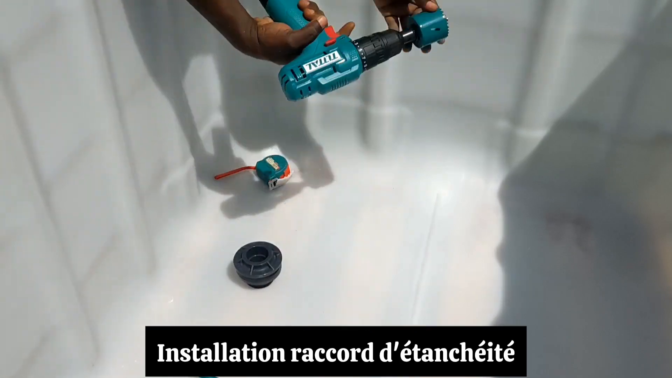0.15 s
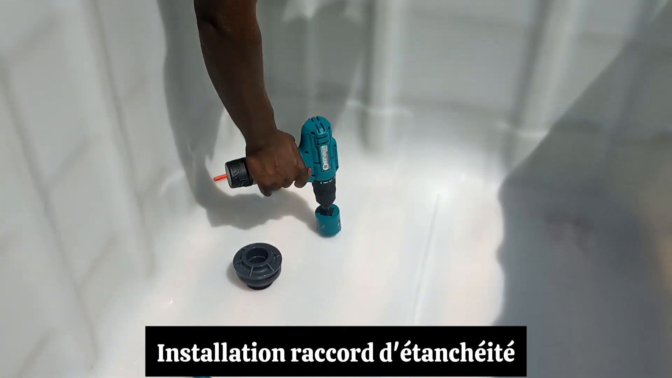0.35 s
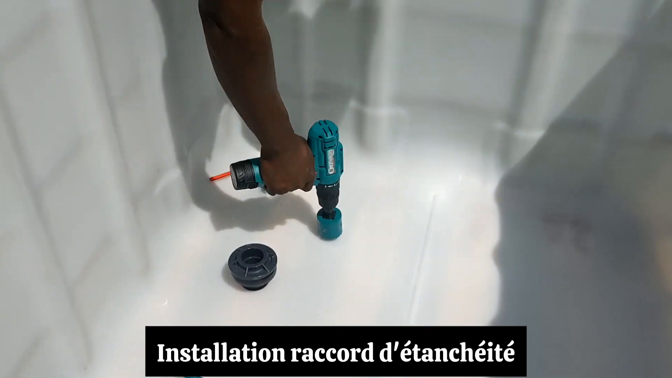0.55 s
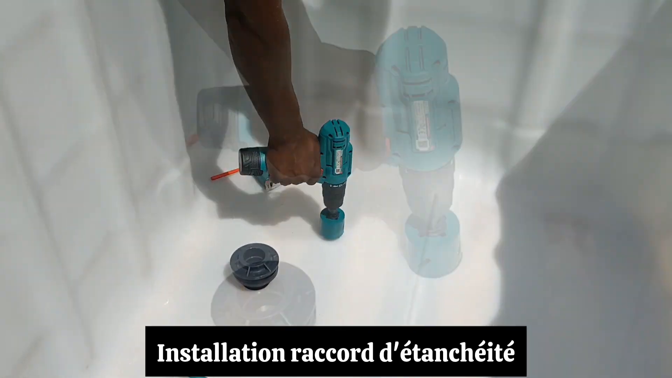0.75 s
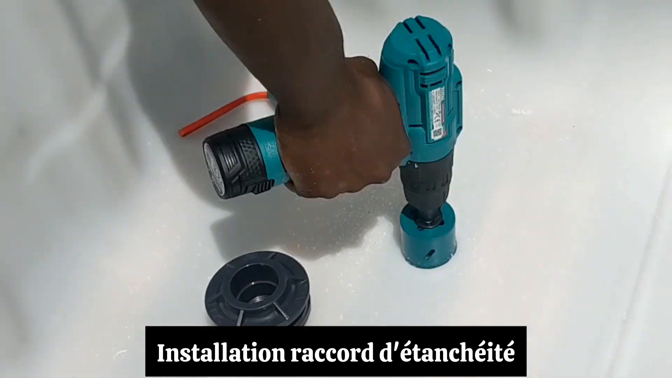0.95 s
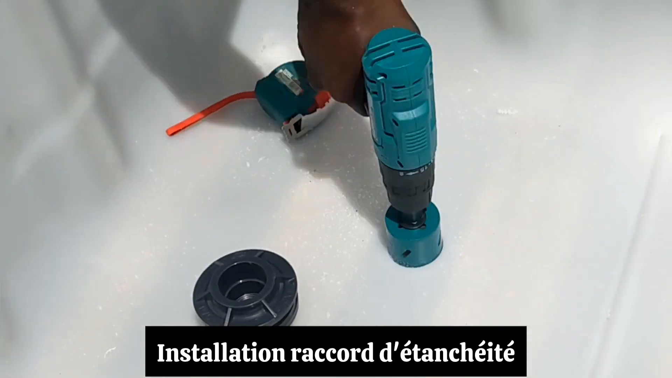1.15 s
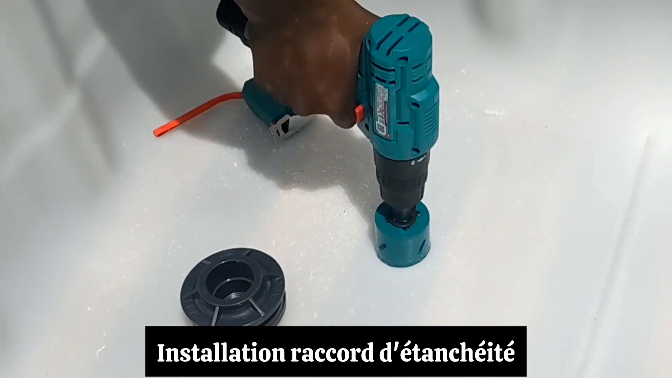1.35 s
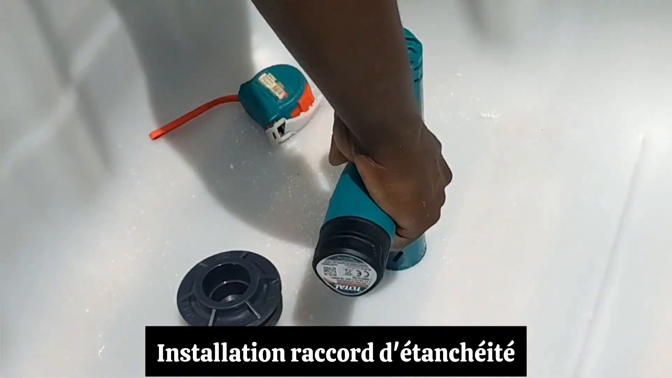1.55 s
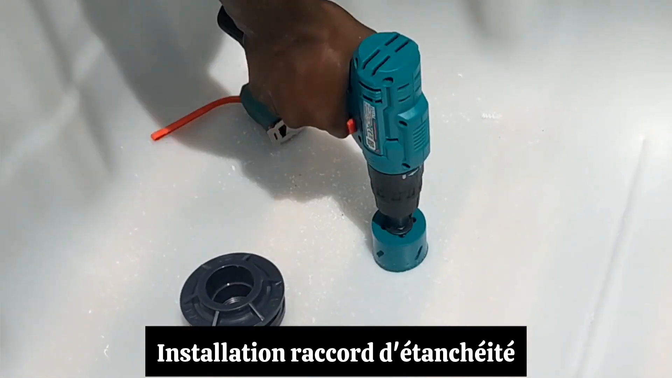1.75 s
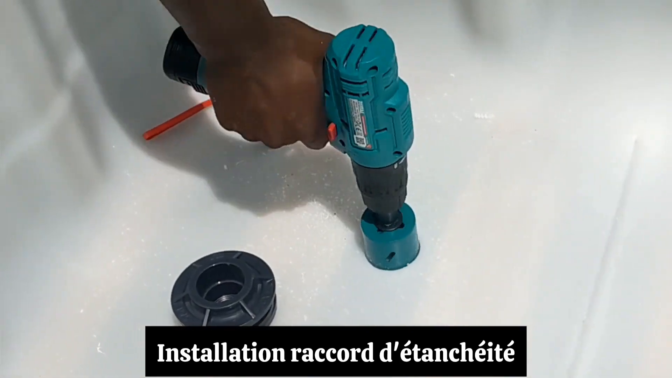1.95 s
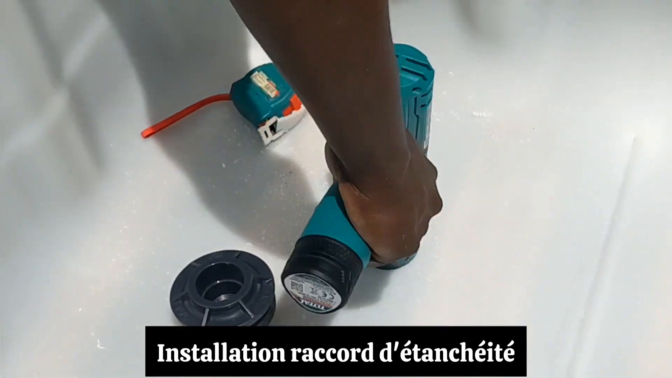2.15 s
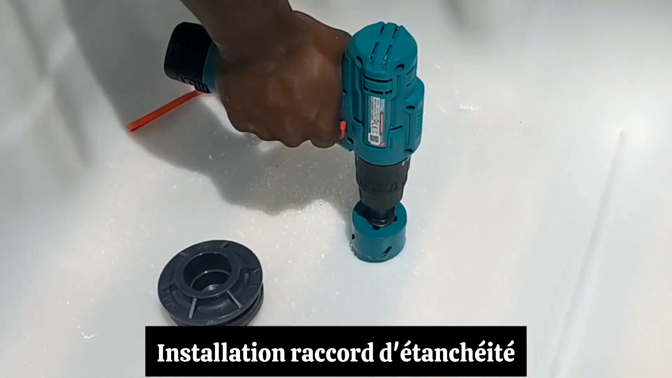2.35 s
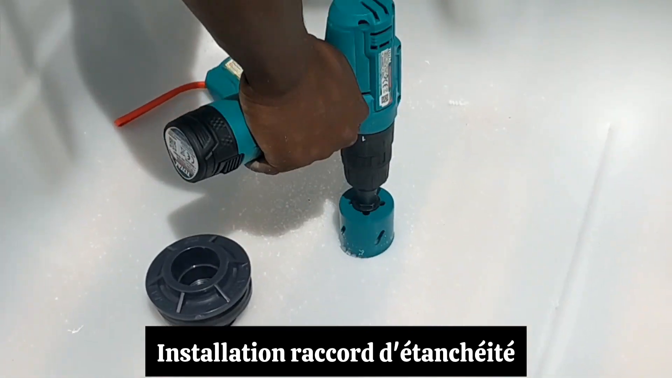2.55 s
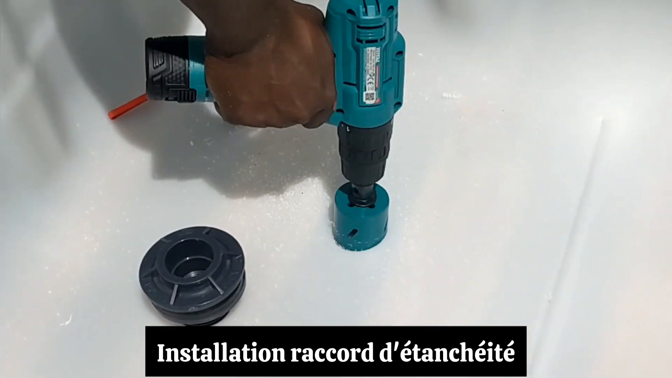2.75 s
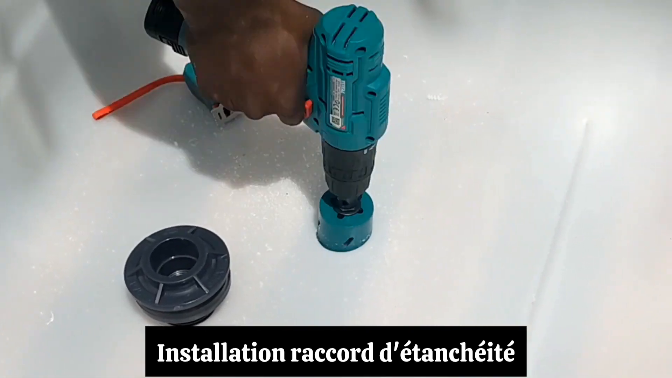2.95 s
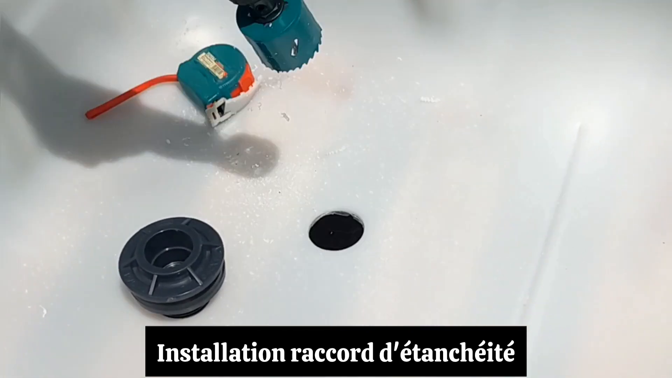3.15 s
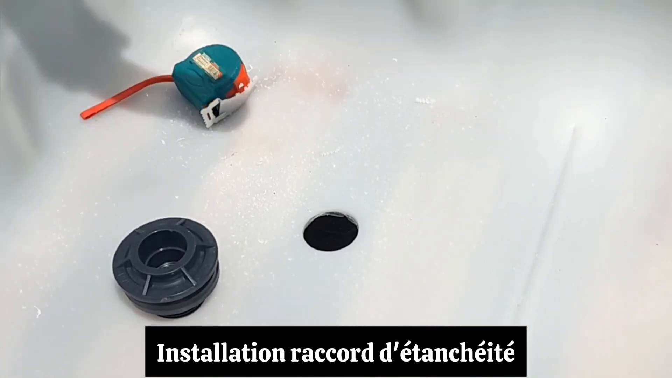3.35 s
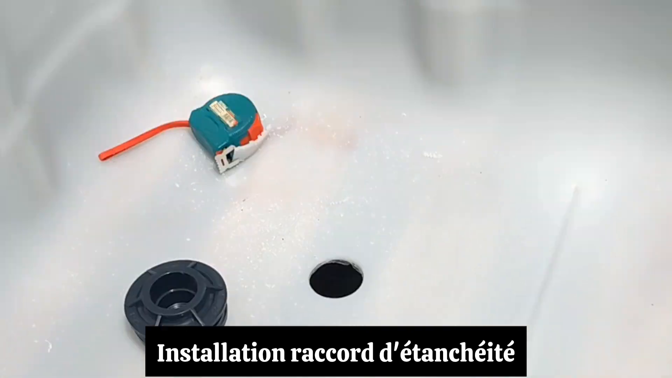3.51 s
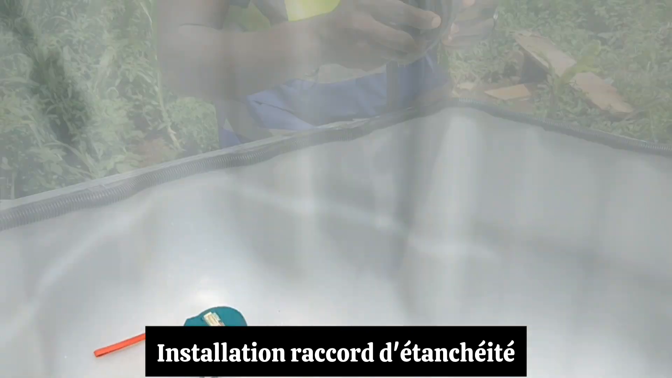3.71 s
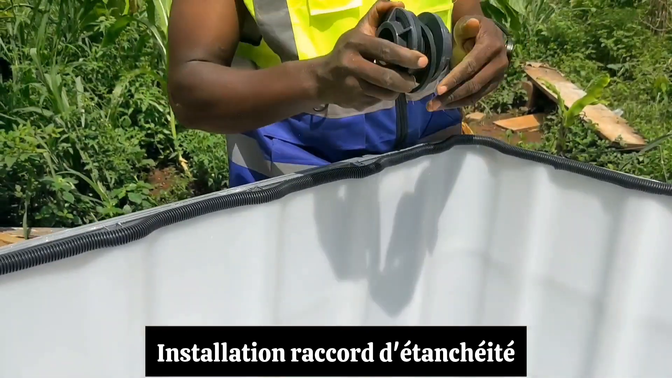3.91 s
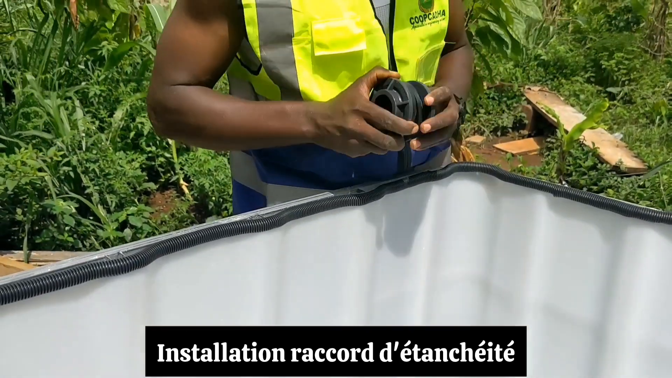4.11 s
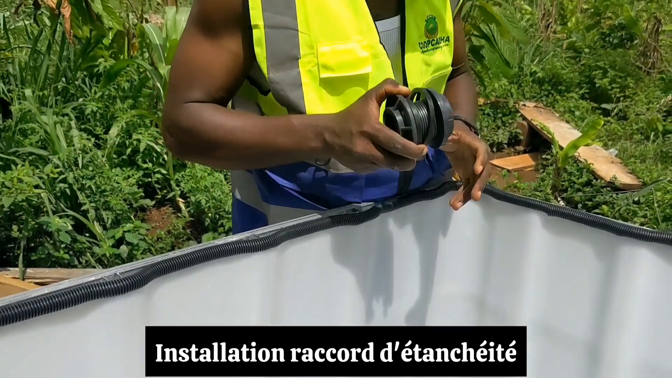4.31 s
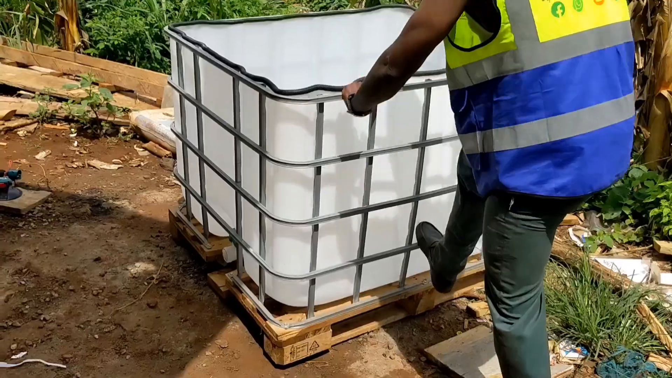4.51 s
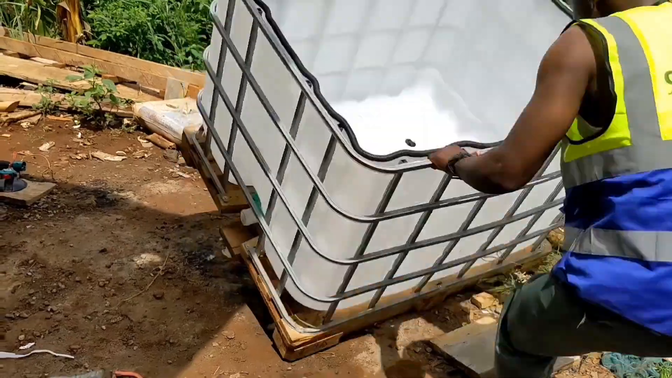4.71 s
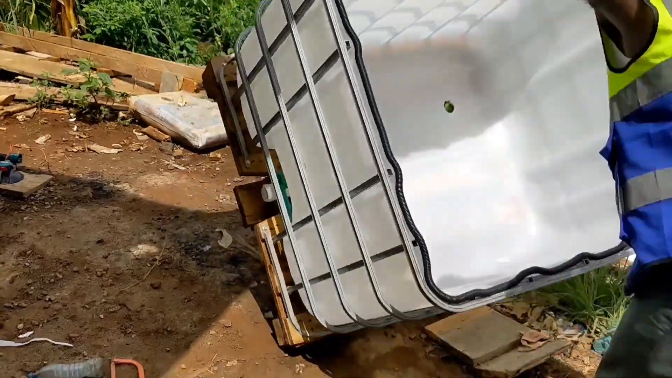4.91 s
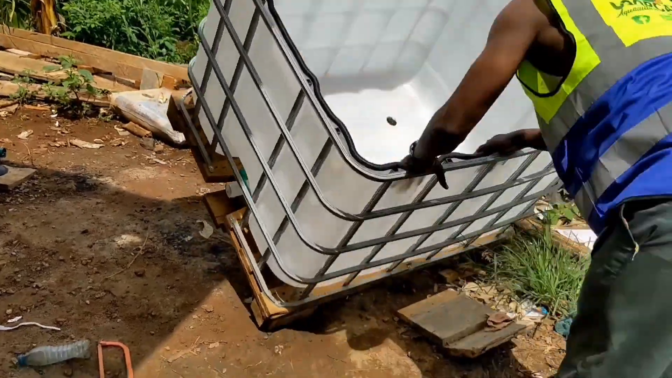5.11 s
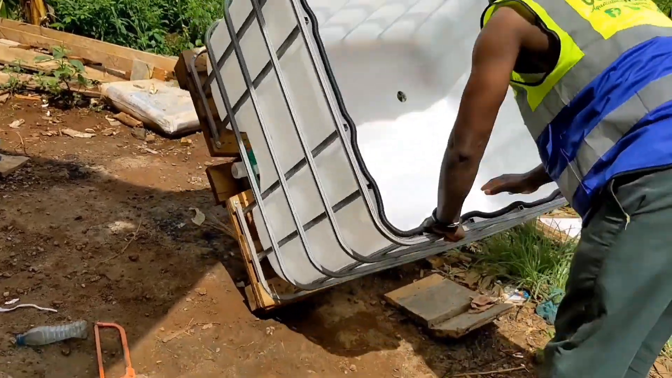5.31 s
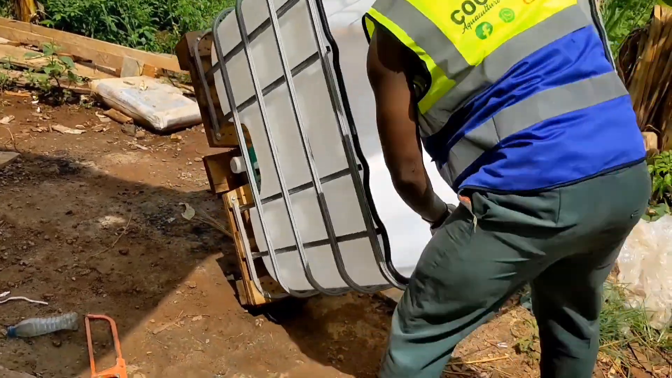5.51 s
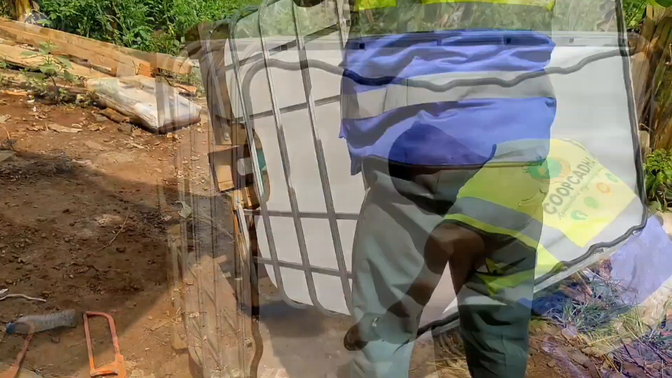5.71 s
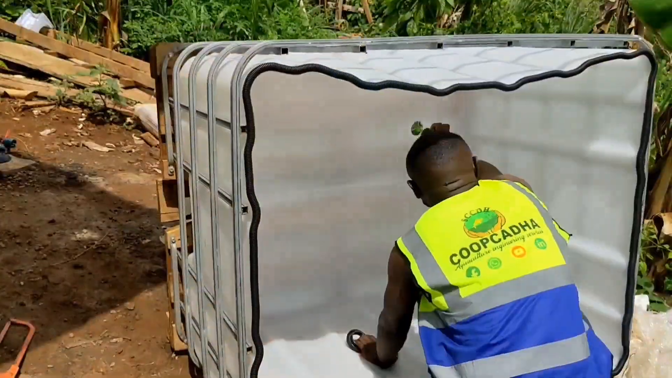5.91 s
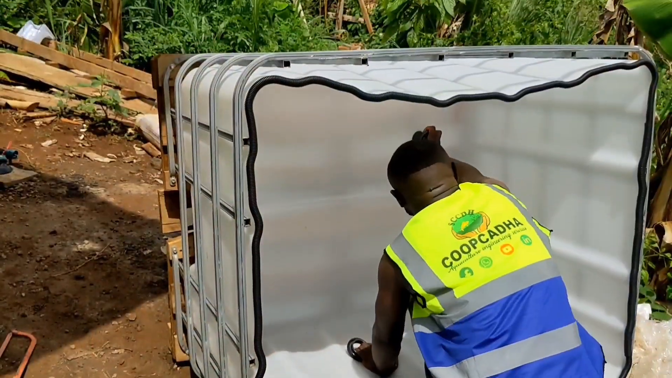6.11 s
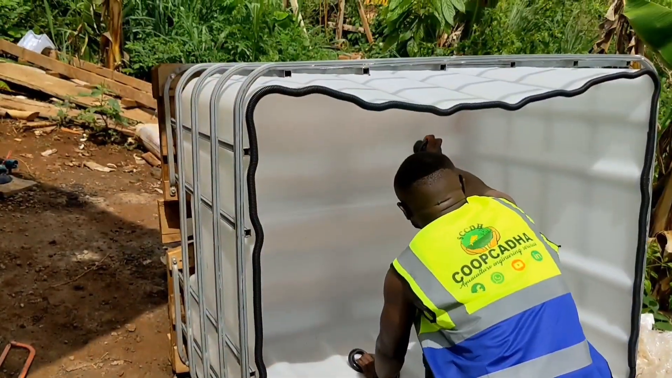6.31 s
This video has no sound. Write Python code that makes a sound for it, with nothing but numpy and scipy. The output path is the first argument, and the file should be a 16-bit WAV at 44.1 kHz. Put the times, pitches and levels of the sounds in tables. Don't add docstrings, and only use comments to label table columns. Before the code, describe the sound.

Close to a phone in a yard, a few dull bumps precede a cordless drill cutting a big plastic tank. Three loud rasping pulls whine unevenly, with hollow shudders and knocks as the saw breaks through. Short motor blips follow, then the tank hums and booms as it is dragged, tipped and dropped with clattering plastic clicks. It dies into faint scuffs and thin outdoor hiss.

```python
import sys
import numpy as np
from scipy import signal
from scipy.fft import rfft, irfft
from scipy.io import wavfile
from scipy.ndimage import uniform_filter1d, minimum_filter1d

SR = 44100
rng = np.random.default_rng(int(sys.argv[2]) if len(sys.argv) > 2 else 0)


def volts(x):
    e = np.asarray(x, float) / 20
    return 10 ** e


def wav_record(signal):
    frames = np.transpose(np.atleast_2d(signal))
    bounded = np.clip(frames, -1, 1)
    quanta = np.round(bounded * 32767).astype(np.int16)
    wavfile.write(sys.argv[1], SR, quanta)


N = 280608
PIECE = 1024
END_S = 5.858

# (start [s], stop [s], level [dB], bite of the teeth [dB], release [s])
PULLS = [
    (0.593, 1.556, 1.5, 3, 0.029),
    (1.575, 1.939, -2, 2, 0.029),
    (1.96, 3.129, 0, -0.5, 0.013),
    (3.236, 3.301, -0.5, -23, 0.011),
    (3.307, 3.39, -0.5, -40, 0.0081),
    (3.469, 3.55, -8, -5, 0.0047),
]
# (time [s], rasp level [dB], bite [dB])
EFFORT = [(.6, -44, -11), (.632, -32, -25), (.68, -37.5, -2.5), (.776, -27, -1), (.966, -21, -3.5),
          (1.5, -22.5, -2), (1.755, -16.5, -4.5), (1.91, -19.5, -1.5), (2., -20.5, 4.5), (2.12, -20.5, -1),
          (2.276, -20, 7), (2.416, -21, 5.5), (2.724, -20, 4.5), (3., -21, 1.5), (3.064, -26.5, 22),
          (3.104, -31, 0), (3.13, -12, -19), (3.2, -26, -8.5)]
# (frequency [Hz], density [dB per Hz])
RASP_COLOUR = [(590, -13.5), (1000, -3.5), (1470, -3.5), (1820, 1), (2560, -1), (2870, -4), (3510, -1),
               (4590, -4.5), (8550, -4.5), (10800, -10), (15200, -4), (15900, -14), (16500, -37)]
# (frequency [Hz], width [Hz], level [dB])
CUP_MODES = [(407, 160, 0), (521.5, 167, 2), (643, 213, 1), (911, 100, 2), (1038, 270, -5.5)]
# (frequency [Hz], width [Hz], level [dB])
WALL_MODES = [(80, 66, -9.5), (103.4, 60, -7), (174.7, 44, 1), (226.5, 35, -2.5), (331, 72, -6.5)]
# (time [s], mesh frequency [Hz], first, second, third partial level [dB])
GEAR_MESH = [
    [(.7, 2084, -46, -52, -59), (.8, 2130, -36.5, -43, -47), (.93, 2125, -30, -33, -45),
     (1.04, 2125, -33, -45, -48), (1.12, 2178, -41, -45.5, -49), (1.25, 2170, -31, -42, -49),
     (1.4, 2176, -42, -34.5, -44), (1.55, 2156, -44, -42.5, -49.5)],
    [(1.59, 1990, -44, -45, -49), (1.63, 1951, -30, -42, -47), (1.69, 1945, -25, -35, -44),
     (1.72, 1856, -28, -30, -39), (1.75, 1884, -18.5, -28, -37), (1.79, 1930, -25.5, -29, -39),
     (1.85, 2002, -23, -40, -45), (1.88, 2030, -36, -44, -43), (1.93, 2033, -42, -47, -47)],
    [(1.98, 2165, -29, -39, -44), (2.1, 2110, -30.5, -38, -49), (2.15, 1980, -40, -35, -43),
     (2.19, 2011, -25, -28, -38), (2.24, 1923, -31, -33.5, -42.5), (2.29, 2122, -27, -38, -46.5),
     (2.33, 2010, -32, -37, -44.5), (2.42, 1937, -31, -35, -44), (2.46, 1907, -23.5, -35, -39),
     (2.55, 1906, -23, -34, -43), (2.61, 1885, -25.5, -33, -33), (2.66, 1850, -32.5, -28, -37),
     (2.71, 1802, -21, -16.5, -31.5), (2.76, 1837, -28.5, -31.5, -39.5), (2.79, 1898, -37, -29, -24.5),
     (2.83, 1825, -36, -24.5, -25), (2.855, 1749, -30.5, -26.5, -27.5), (2.91, 1767, -30, -29.5, -27),
     (2.95, 1835, -37, -35.5, -36.5), (3.03, 1934, -46, -42, -47.5)],
]
# (time [s], level [dB])
STRAIN = [(.8, -48.5), (1.3, -39.5), (1.6, -43.5), (1.74, -31.5), (1.82, -44.5), (2.15, -44.5),
          (2.236, -32.5), (2.35, -43), (2.5, -34.5), (2.64, -37.5), (2.72, -34.5), (2.8, -38.5),
          (2.89, -34), (2.96, -34), (3.03, -42.5)]
# (time [s], frequency [Hz], level [dB])
SECOND_STAGE = [(.7, 1674, -52.5), (.85, 1806, -43.5), (1.1, 1787, -47.5), (1.5, 1756, -44.5),
                (1.9, 1762, -51.5)]
# (time [s], length [s], from [Hz], to [Hz], level [dB])
SQUEALS = [
    (0.569, 0.035, 3090, 3150, -42.5),
    (0.601, 0.013, 2960, 3420, -35.5),
    (0.617, .045, 2960, 3140, -39),
    (0.644, 0.024, 2540, 2550, -36.5),
    (0.616, 0.063, 986, 1043, -43),
    (3.224, 0.038, 3070, 3460, -34),
    (3.308, .02, 3180, 3420, -38),
    (3.363, 0.029, 880, 787, -34.5),
    (3.528, 0.0091, 748, 600, -33),
]
# (time [s], length [s], from [Hz], to [Hz], level [dB])
HUMS = [(2.15, 0.095, 195.7, 199.1, -22.5), (2.22, 0.073, 212, 234, -26), (2.31, 0.061, 175, 174.4, -21.5),
        (2.46, 0.068, 228, 236, -25), (2.55, .11, 225, 223, -25), (2.64, 0.11, 225, 238, -20),
        (2.79, 0.048, 245, 247, -28), (2.82, .13, 178.3, 170.5, -30), (3.65, .18, 64, 70, -42),
        (3.82, 0.19, 66, 66, -36), (3.98, .09, 73.3, 72, -33.5), (4.13, .2, 75.7, 75.7, -33.5),
        (4.35, .11, 73, 74.6, -36), (4.49, .08, 95.6, 115.6, -33), (4.6, .07, 105, 106, -46)]
# (time [s], weight level [dB], scuff level [dB])
SLIDE = [(.25, -58, -72), (.42, -65, -108), (.56, -72, -63), (3.15, -46.5, -62.5), (3.44, -49.5, -59),
         (3.57, -45, -71), (3.668, -44, -56), (3.764, -31, -50), (3.858, -29.5, -44), (4.086, -35.5, -49.5),
         (4.2, -35.5, -51.5), (4.372, -40, -52.5), (4.534, -35.5, -53), (4.69, -56, -57), (5.21, -51, -65),
         (5.4, -46.5, -62), (5.62, -53, -56.5), (5.7, -63, -72.5), (5.87, -55, -72)]
# (time [s], rise [s], weight level [dB], scuff level [dB], fall [dB per s])
SHOVES = [
    (0., 0.00096, -39, -53.5, 400),
    (0.169, 0.027, -36, -51, 500),
    (0.294, 0.0076, -40, -41.5, 700),
    (4.72, 0.0096, -28, -37.5, 85),
    (4.864, 0.006, -32.5, -42.5, 11),
    (5.003, 0.009, -25, -25.5, 85),
    (5.101, 0.0062, -26.5, -37, 171),
    (5.582, .008, -66.5, -56, 12),
    (5.64, .005, -72, -75, 300),
]
# (frequency [Hz], density [dB per Hz])
BOOM_COLOUR = [(15, -55.5), (40, -16), (60, -4.5), (80, -2), (105, -5), (135, -34), (170, -43.5),
               (400, -120)]
# (frequency [Hz], density [dB per Hz])
PANEL_COLOUR = [(40, -66.5), (90, -28), (130, 7), (190, 0.5), (300, -7), (400, -14), (520, -35),
                (1500, -120)]
# (frequency [Hz], density [dB per Hz])
SCRAPE_COLOUR = [(240, -41.5), (400, -11), (500, -3.5), (738, -5.5), (1010, -9), (1270, -11.5),
                 (2000, -15.5), (2600, -41), (4400, -120)]
# (frequency [Hz], density [dB per Hz])
RUSTLE_COLOUR = [(1180, -26), (2000, 5.5), (3340, 1), (4590, -4), (4970, -12.5), (6880, -6), (10700, -22.5),
                 (15100, -8.5), (16100, -16), (16500, -37)]
# (middle [s], length [s], level [dB])
BRUSHES = [(3.77, 0.055, -60), (3.885, 0.027, -57), (4.021, 0.056, -56.5), (4.154, 0.052, -55.5),
           (4.394, 0.021, -57.5), (4.514, 0.018, -55.5), (4.818, .04, -55), (4.88, 0.038, -49.5),
           (5.02, 0.042, -45.5), (5.103, 0.013, -36.5), (5.148, 0.018, -51), (5.47, 0.036, -57),
           (5.618, .06, -59.5)]
# (frequency [Hz], density [dB per Hz])
BRUSH_COLOUR = [(3000, -20), (5500, -2.5), (7000, -0.5), (10700, -11.5), (15000, 1.5), (16300, -28.5)]
# (time [s], thud level [dB], body level [dB])
KNOCKS = [(0., -34, -45), (0.184, -50, -52), (0.203, -48, -46), (0.299, -48, -36), (0.367, -37, -46),
          (2.2553, -10, -10), (2.324, -25, -12), (3.037, -13, -25), (3.051, -5, -8), (3.226, -30.5, -44),
          (3.397, -38, -39), (3.505, -28, -46), (3.9004, -44, -35), (4.03, -28, -51), (4.146, -30, -48),
          (4.505, -23, -36), (4.58, -27, -35), (4.6178, -34, -36), (4.732, -24, -18.5), (4.7516, -34, -21),
          (4.7845, -26, -22), (4.8, -32, -27), (4.818, -35, -33), (4.876, -38, -23), (4.8827, -31, -23),
          (4.975, -25, -21.5), (5.013, -39, -12.5), (5.0308, -19, -15), (5.056, -15, -30),
          (5.0651, -24, -17.5), (5.084, -28, -27), (5.1017, -23, -10.5), (5.2513, -48, -39),
          (5.463, -30, -39)]
# (frequency [Hz], level [dB], t60 [s])
THUD_MODES = [(94, -7, 0.097), (116.6, -0.5, 0.055), (168, -1, 0.047), (250, -15, .04)]
# (frequency [Hz], level [dB], t60 [s])
BODY_MODES = [(303, -1, 0.034), (525, -2.5, .04), (749, -1, 0.028), (880, -10, 0.024), (1090, -6.5, 0.014)]
# (time [s], frequency [Hz], level [dB], t60 [s])
THUMPS = [(-.002, 90, -13, 0.064), (.298, 230, -31, 0.044), (.31, 189, -31, 0.056),
          (2.252, 172, -7.5, 0.072), (3.045, 205, -13.5, 0.076), (4.733, 122, -14.5, 0.18),
          (4.741, 260, -29, 0.025), (4.785, 135, -21, 0.13), (4.81, 170, -29, 0.11), (4.83, 109, -20, .06),
          (4.879, 250, -15, .07), (4.91, 119.5, -26, .25), (5.056, 121, -14, .1), (5.07, 109, -17, 0.15),
          (5.083, 134.4, -14, 0.19), (5.094, 150, -12.5, .08), (5.104, 182, -23, 0.043),
          (5.12, 106, -21.5, .25)]
# (time [s], frequency [Hz], level [dB], t60 [s])
BUMPS = [
    (.05, 85, -25, 0.064),
    (.118, 90, -32, .05),
    (.174, 130, -26, .05),
    (.187, 202, -8, 0.028),
    (.2035, 226, -1.5, 0.025),
    (.2115, 97, -0.5, 0.05),
    (.26, 110, -40, .1),
    (.42, 111, -43, .1),
]
# (time [s], crack level [dB], hiss re crack [dB], t60 [s], crack frequency [Hz])
CLICKS = [(0., -34, -6, 0.007, 1500), (0.021, -36.5, -6, 0.073, 2300), (0.184, -54, 10.5, .09, 1300),
          (.199, -57, -3, .04, 900), (0.296, -42, -3, 0.03, 1800), (3.197, -40, -5, 0.06, 1980),
          (3.513, -30, -18, .012, 2500), (3.626, -46, 0, .02, 1500), (3.801, -20, -19, 0.019, 3170),
          (3.85, -31, -24, .02, 2100), (3.898, -36, -22, 0.026, 3200), (3.961, -24, -35, 0.028, 2200),
          (4.4639, -34.5, -12, 0.019, 2000), (4.5038, -35.5, -21, 0.093, 1690),
          (4.5796, -44, -15, .03, 1400), (4.6162, -31, -4, 0.062, 1840), (4.6918, -46, 1, 0.044, 1500),
          (4.7294, -32, -6, 0.095, 1600), (4.751, -27.5, -5, 0.044, 4500), (4.783, -36, -3, 0.1, 2600),
          (4.801, -40, -14, .04, 1200), (4.8704, -26.5, -8, 0.094, 2000), (4.9099, -45, -14, 0.027, 1490),
          (4.936, -29, -23, 0.13, 2200), (4.9453, -27, -15, .05, 2300), (5.004, -23, -13, 0.066, 2000),
          (5.014, -12.5, -23, 0.039, 2560), (5.026, -13, -8, 0.064, 3000), (5.0643, -26, -16, 0.076, 2200),
          (5.094, -17, -14, 0.054, 1600), (5.1029, -10, -29, 0.026, 1780), (5.144, -26, -19, 0.043, 2370),
          (5.2516, -40, -20, 0.053, 1790), (5.503, -42, -6, 0.072, 2010), (5.583, -36.5, -19.5, .025, 3000),
          (5.62, -38, -13, 0.093, 2000), (5.789, -43, -25, 0.017, 1800), (5.811, -47.5, -12, 0.056, 2000)]
# (frequency [Hz], density [dB per Hz])
AIR_COLOUR = [(300, -31), (700, 1), (1200, -2.5), (1950, 2), (7000, -2), (10700, -11), (15000, -3),
              (16500, -31)]
# (frequency [Hz], correlation [0-1])
LIKENESS = [(60, 0.97), (130, 1), (290, 0.85), (640, 0.5), (1410, 0), (3100, 0.05), (6820, 0), (15000, 0.1)]
# (frequency [Hz], left minus right [dB])
LEAN = [(60, 0), (110, -0.5), (200, -1), (380, -1), (700, -0.5), (1290, 0), (2380, 0), (4400, 0),
        (8120, -2.5), (15000, -5.5)]


def unit(x):
    return x / np.sqrt(np.mean(x ** 2))


def columns(table):
    s, *cols = np.transpose(table)
    return [np.interp(np.arange(N) / SR, s, c) for c in cols]


def along(table, hz):
    table_hz, value = np.transpose(table)
    return np.interp(np.log(hz + 1), np.log(table_hz + 1), value)


def within(start, stop, fade):
    t = np.arange(N) / SR
    return uniform_filter1d(1. * ((t >= start) & (t < stop)), int(fade))


def held(length, slew):
    steps = np.repeat(rng.standard_normal(N // int(length) + 1), int(length))[:N]
    return uniform_filter1d(steps, int(slew))


def ports(pair, gain=1):
    hz = np.fft.rfftfreq(N, 1 / SR)
    mid, side = rfft(pair) * gain
    like = np.clip(along(LIKENESS, hz), 0, 1)
    lean = volts(along(LEAN, hz) / 2)
    mid, side = mid * np.sqrt(1 + like), side * np.sqrt(1 - like)
    return irfft(np.array([(mid + side) * lean, (mid - side) / lean]), N)


def filtered_noise(gain, grain):
    out = ports(grain * rng.standard_normal((2, N)), gain)
    return out / np.sqrt(np.mean(out.mean(axis=0) ** 2))


def shaped(colour, grain=1):
    return filtered_noise(volts(along(colour, np.fft.rfftfreq(N, 1 / SR))), grain)


def resonant(modes, grain=1):
    hz = np.fft.rfftfreq(N, 1 / SR) + 1e-3
    gain = sum(volts(db) / (1 + 1j * (hz - f * f / hz) / width) ** 2 for f, width, db in modes)
    return filtered_noise(gain, grain)


def splices(step_db, dip):
    sag = np.resize(1 - dip * np.cos(np.pi * np.arange(PIECE) / PIECE) ** 8, N)
    return unit(sag * volts(step_db * held(PIECE, 200)))


def mottle(x, patch_db, hole_db, bins):
    _, s, z = signal.stft(x, SR, nperseg=2 * PIECE)
    patchy = np.interp(s, [.7, .82], [1.6, 1])
    patches = uniform_filter1d(rng.standard_normal(z.shape[1:]), int(bins), axis=0) * np.sqrt(bins) * patchy
    whole = 1. * (rng.random(z.shape[1:]) > .004 * patchy)
    whole = minimum_filter1d(whole, size=7, axis=0)
    whole = minimum_filter1d(whole, size=2, axis=1)
    gain = volts(patch_db * patches - hole_db * (1 - whole))
    return unit(signal.istft(z * gain, nperseg=2 * PIECE)[1][:, :N]) * np.sqrt(np.mean(x ** 2))


def tone(hz, levels_db, waver, patchy_db):
    stepped = np.repeat(np.roll(hz, -PIECE // 2)[::PIECE], PIECE)[:N]
    hz = uniform_filter1d(stepped, 300)
    jitter = waver * held(PIECE, 200) + .9 * waver * held(250, 120)
    phase = 2 * np.pi * np.cumsum(hz * (1 + jitter)) / SR
    out = 0
    for k, db in enumerate(levels_db):
        port_phase = np.array([[.6], [-.6]]) * (-1) ** k
        port_phase = port_phase + 0.38 * np.array([held(PIECE, 300), held(PIECE, 300)])
        out = out + volts(db + 4.5) * splices(patchy_db, dip=.3) * np.sin((k + 1) * phase + port_phase)
    return out


def trigger():
    attack_s, edge_db = 0.016, -19.5
    t, on, db, bite_db = np.arange(N) / SR, 0, 0, 0
    for start, stop, level_db, pull_bite_db, release in PULLS:
        edge = np.clip(np.maximum(1 - (t - start) / attack_s, 1 - (stop - t) / release), 0, 1)
        near = (t >= start - .009) & (t < stop + .009)
        on = on + within(start, stop, 430)
        db = db + near * (level_db + edge_db * edge)
        bite_db = bite_db + near * pull_bite_db
    return on, db, bite_db


def saw(on, db, bite_db):
    cup_db = -7.93 + 0.48 * bite_db
    wall_db = -6.6 + bite_db
    rasp = shaped(RASP_COLOUR, volts(0.63 * held(30, 8.5))) * splices(step_db=1.0, dip=0.31)
    rasp = mottle(rasp, patch_db=2.0, hole_db=26, bins=5)
    cup = mottle(resonant(CUP_MODES, volts(1.2 * held(150, 60))), patch_db=1.5, hole_db=9.5, bins=2.8)
    cup = cup * splices(step_db=0.5, dip=0.29)
    wall = resonant(WALL_MODES, volts(3.7 * held(400, 200))) * splices(step_db=0.0, dip=0.1)
    arbor = tone(np.full(N, 2546.), [-17], waver=.008, patchy_db=6)
    return on * volts(db) * (arbor + volts(0.18) * rasp + volts(cup_db) * cup + volts(wall_db) * wall)


def gears(running):
    hz, first, second, third = columns(np.vstack(GEAR_MESH))
    strain_db = columns(STRAIN)[0]
    levels = [first, second, third] + [strain_db + db for db in [3, -3.5, -7]]
    mesh = within(GEAR_MESH[0][0][0], GEAR_MESH[-1][-1][0], 900) * tone(hz, levels, waver=.0035, patchy_db=2)
    hz, db = columns(SECOND_STAGE)
    stage = tone(hz, [db + k for k in [1, -1, -7.5]], waver=0.004, patchy_db=4)
    return running * (mesh + within(SECOND_STAGE[0][0], SECOND_STAGE[-1][0], 900) * stage)


def glides(notes):
    out = np.zeros((2, N))
    for s, length, hz0, hz1, db in notes:
        n, i = int(length * SR), int(s * SR)
        steps = np.repeat(rng.standard_normal((2, n // 200 + 1)), 200, axis=1)
        wobble = uniform_filter1d(steps, 150)[:, :n]
        phase = 2 * np.pi * np.cumsum(np.linspace(hz0, hz1, n)) / SR + 0.35 * wobble[0]
        fourth = (hz0 > 2000 and s < 1) * volts(-15) * np.sin(4 * phase)
        swell = np.sqrt(2 * np.sin(np.linspace(0, 3, n)))
        out[:, i:i + n] += volts(db + 1.5 * wobble[1]) * swell * (np.sin(phase) + fourth)
    return out


def drag():
    t = np.arange(N) / SR
    weight, scuff = volts(columns(SLIDE))
    heavy = light = brush = 0
    next_shove = [row[0] for row in SHOVES[1:]] + [END_S]
    for (s, rise, weight_db, scuff_db, fall_db), after in zip(SHOVES, next_shove):
        let_go = np.clip((after + 0.011 - t) / .015, 0, 1)
        up = np.clip((t - s) / rise, 0, 1) ** 2 * let_go
        down_db = -fall_db * np.clip(t - s - rise, 0, 1)
        heavy = heavy + up * volts(weight_db + down_db)
        light = light + up * volts(scuff_db + 1.13 * down_db)
    for s, length, db in BRUSHES:
        brush = brush + volts(db) * np.clip(1 - (2 * (t - s) / length) ** 4, 0, 1)
    boom = np.hypot(weight * volts(-2.5), heavy * volts(-3.5))
    panel = np.hypot(weight * volts(-4.5), heavy * volts(-0.5))
    scrape = np.hypot(scuff * volts(-1), light * volts(0.5))
    rustle = np.hypot(scuff * volts(-10.5), light * volts(-13))
    panel = panel * volts(-10 * np.interp(t, [.6, 3.101, 4.4, 4.55], [0, 1, 1, 0]))
    boom = boom * volts(-4.5 * within(SLIDE[5][0], 4.55, 2000))
    out = boom * shaped(BOOM_COLOUR)
    out = out + panel * shaped(PANEL_COLOUR, volts(3.0 * held(500, 220)))
    out = out + scrape * shaped(SCRAPE_COLOUR, volts(2.1 * held(300, 100)))
    out = out + rustle * shaped(RUSTLE_COLOUR, volts(2.3 * held(200, 60)))
    return out + brush * shaped(BRUSH_COLOUR, volts(2.1 * held(200, 60)))


def ring(modes, t, chance):
    x = 0
    for (hz, db, t60), a, b in zip(modes, *chance):
        x = x + volts(db + 3.3 * a) * np.sin(2 * np.pi * hz * (1 + 0.055 * b) * t) * 1000. ** (-t / t60)
    x = x * np.clip(t / 0.0044, 0, 1)
    return x / np.abs(x).max()


def knocks():
    out, t = np.zeros((2, N + 4096)), np.arange(4096) / SR
    for s, thud_db, body_db in KNOCKS:
        chance, i = rng.standard_normal((3, 2, 5)), int(s * SR)
        left = ring(BODY_MODES, t, chance[1])
        right = ring(BODY_MODES, t, 0.9 * chance[1] + chance[2])
        lean_db = 1.5 * chance[2, 0, 0] * np.array([[1], [-1]])
        thud = volts(thud_db - 3.5 + lean_db) * ring(THUD_MODES, t, chance[0])
        out[:, i:i + len(t)] += thud + volts(body_db - 2.0) * np.array([left, right])
    return out[:, :N]


def thumps(blows):
    out, t = np.zeros(N), np.arange(N) / SR
    for s, hz, db, t60 in blows:
        i = slice(max(int(s * SR), 0), int((s + t60) * SR))
        since = t[i] - s
        fall = 1000. ** (-since / t60) * np.clip(since / 0.0029, 0, 1)
        out[i] += volts(db) * np.sin(2 * np.pi * hz * since) * fall
    return out


def band(x, lo, hi):
    return unit(signal.sosfilt(signal.butter(2, [lo, hi], "band", fs=SR, output="sos"), x))


def clicks():
    out, t = np.zeros((2, N + 4096)), np.arange(4096) / SR
    for s, db, hiss_db, t60, hz in CLICKS:
        x = rng.standard_normal((2, 2, len(t)))
        x[:, :, int(t60 * SR / 16)] = volts(17)
        crack = band(x[0], hz / 1.59, hz * 1.59)
        hiss = band(x[1], 5000, 20000)
        fall, i = 1000. ** (-t / t60) * np.clip(t / (0.078 * t60), 0, 1), int(s * SR)
        out[:, i:i + len(t)] += fall * volts(db - 7.5) * (crack + volts(hiss_db - 0.5) * hiss)
    return out[:, :N]


def insects():
    presence = np.interp(np.arange(N) / SR, [3.6, 4.2, 5.4, 5.85], [0, 1, 1, 0])
    return presence * volts(-76.0) * resonant([(6850, 880, 0)], volts(5.0 * held(400, 200)))


def air():
    fade_db = np.interp(np.arange(N) / SR, [5.66, END_S], [0, -11])
    return volts(-69 + fade_db + 1.5 * held(PIECE, 400)) * shaped(AIR_COLOUR)


def scene():
    on, pull_db, pull_bite_db = trigger()
    db, bite_db = columns(EFFORT)
    drill = saw(on, db + pull_db, bite_db + pull_bite_db) + gears(on * volts(pull_db)) + glides(SQUEALS)
    lean_db = np.interp(np.arange(N) / SR, [0.64, 0.71], [-4, 0]) / 2
    tank = (drag() + knocks() + thumps(THUMPS)) * volts([lean_db, -lean_db])
    tank = tank + clicks() + glides(HUMS) + thumps(BUMPS) * [[.04], [1]]
    return drill + tank + insects() + air()


def top_cut(x):
    return signal.sosfilt(signal.butter(12, 17060, fs=SR, output="sos"), x)


def record(dry):
    wet = np.tanh(1.1 * dry) / 1.1
    wet = signal.sosfilt(signal.ellip(10, .3, 70, 15800, fs=SR, output="sos"), wet)
    wet = signal.sosfilt(signal.butter(2, 42, "high", fs=SR, output="sos"), wet)
    wet = wet * np.clip((END_S - np.arange(N) / SR) / 0.011, 1e-5, 1)
    wet = wet + 1e-8 * rng.standard_normal(dry.shape)
    return top_cut(wet)


dry = scene()
out = record(dry)
wav_record(out)
```